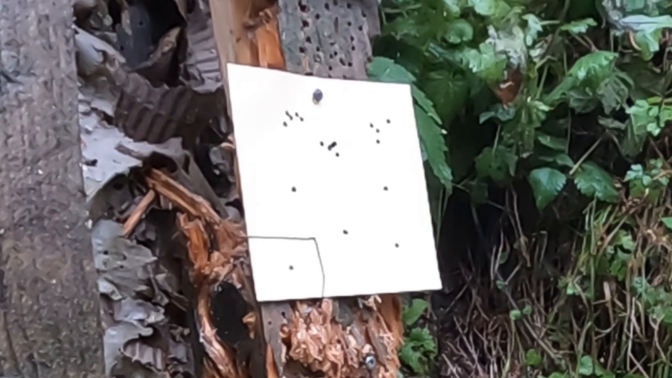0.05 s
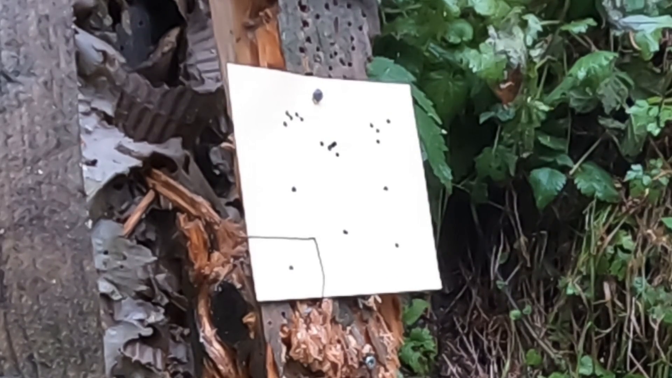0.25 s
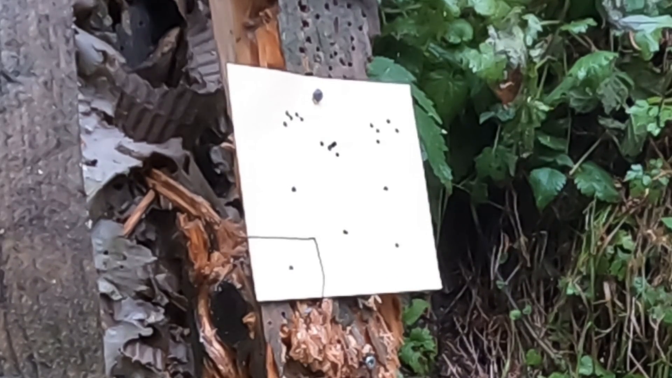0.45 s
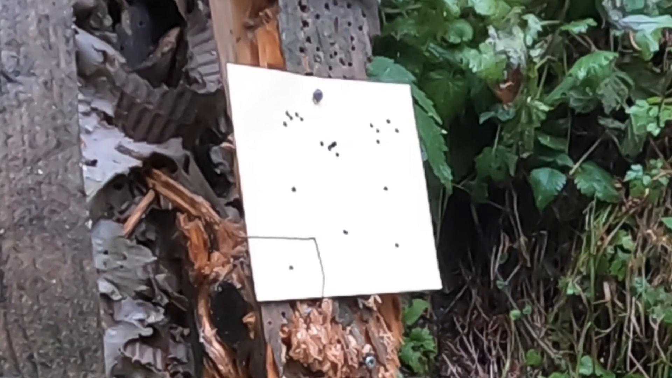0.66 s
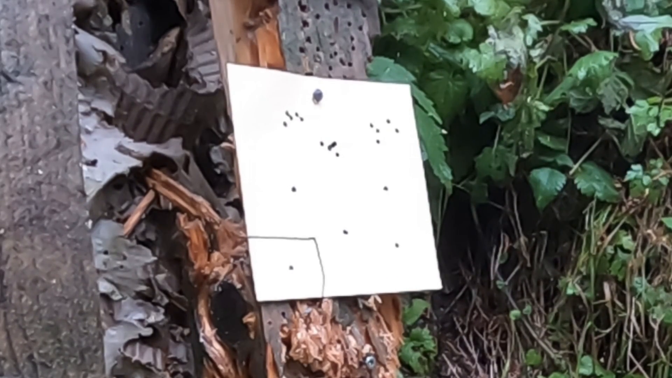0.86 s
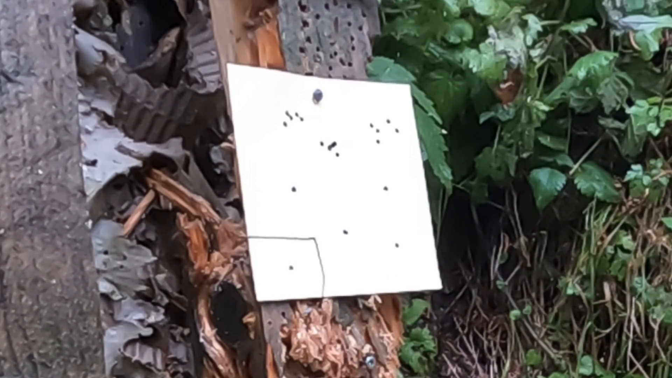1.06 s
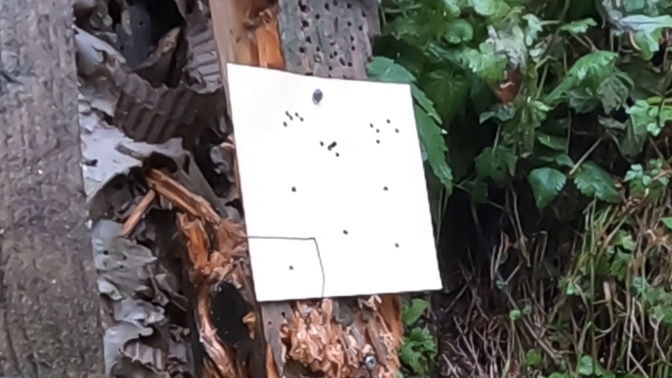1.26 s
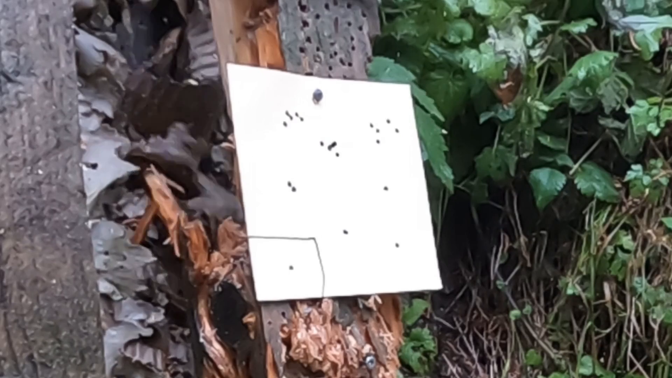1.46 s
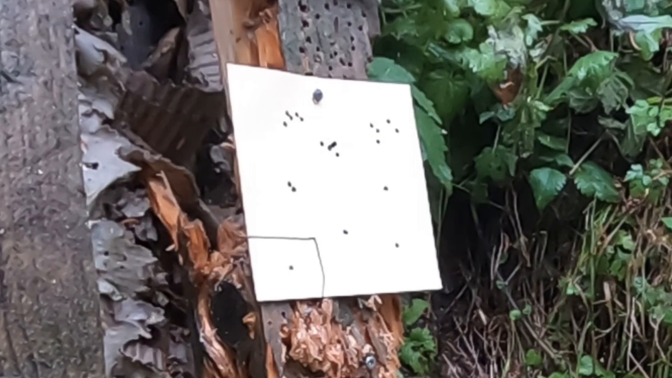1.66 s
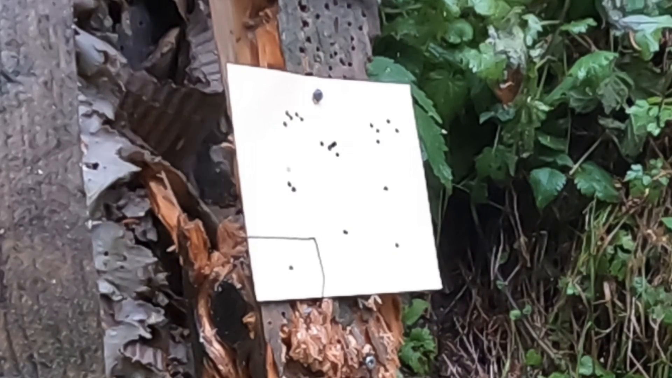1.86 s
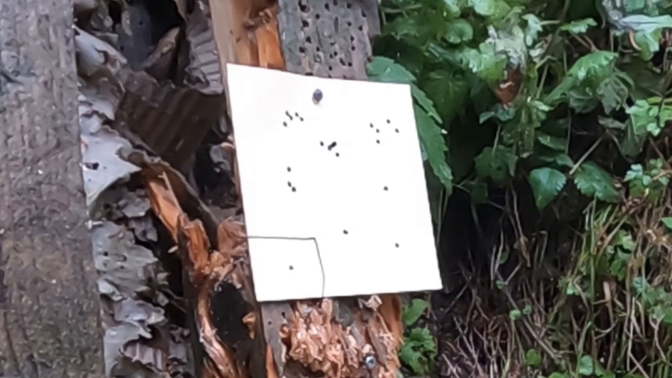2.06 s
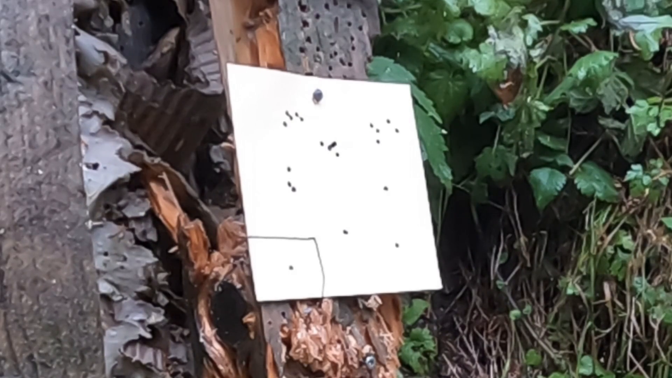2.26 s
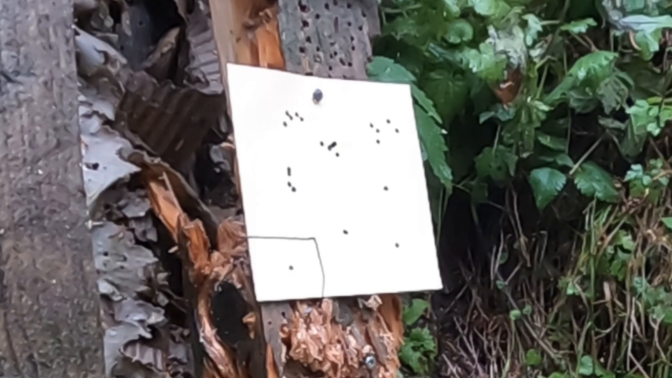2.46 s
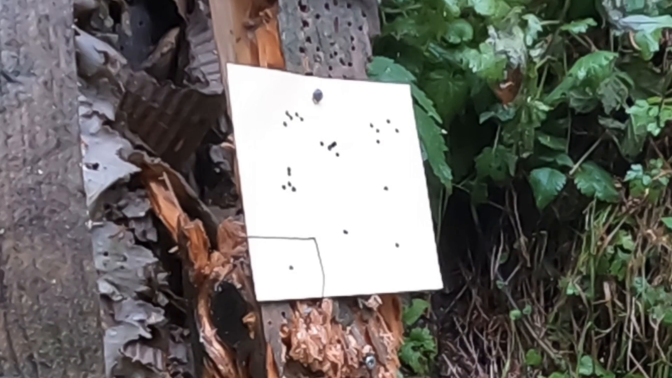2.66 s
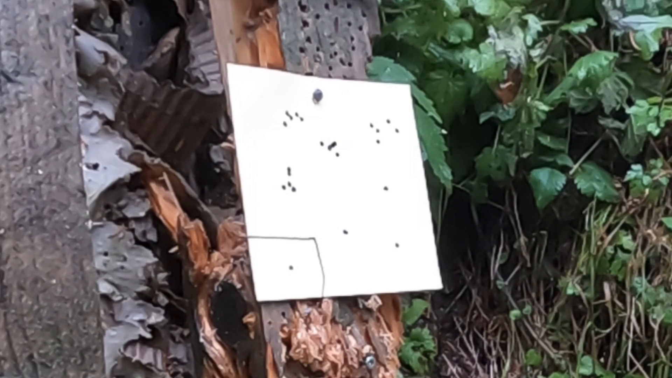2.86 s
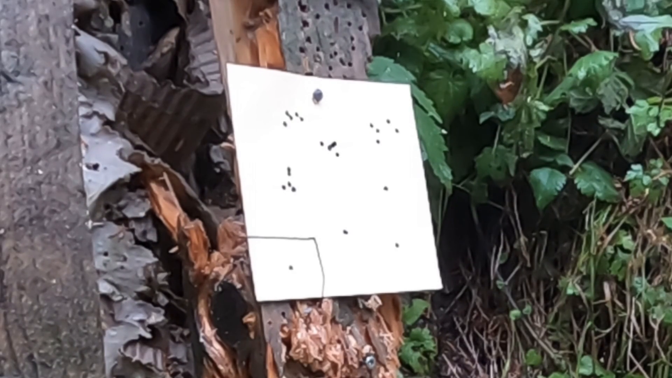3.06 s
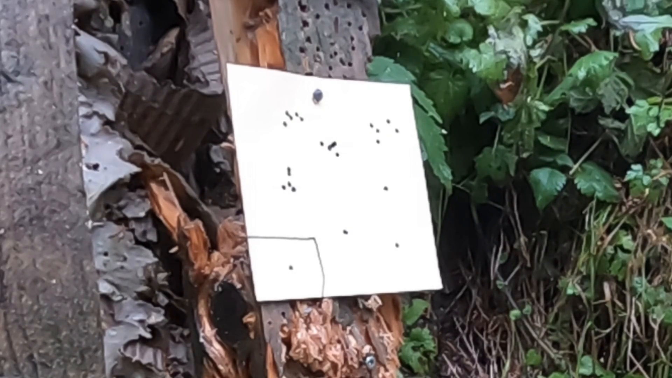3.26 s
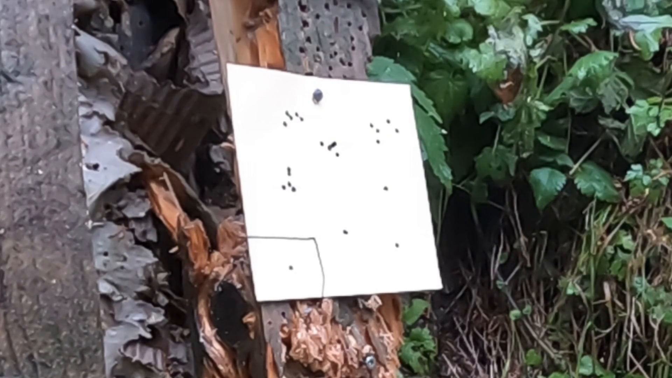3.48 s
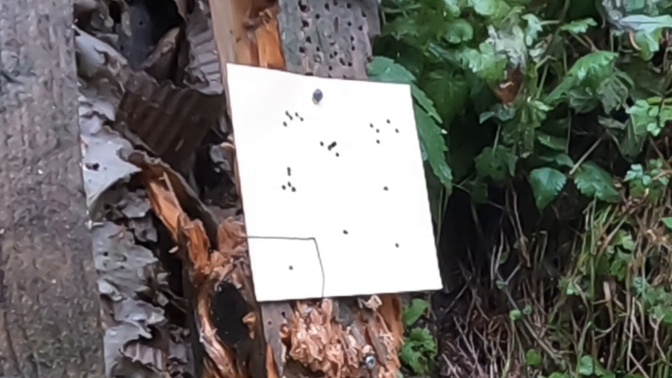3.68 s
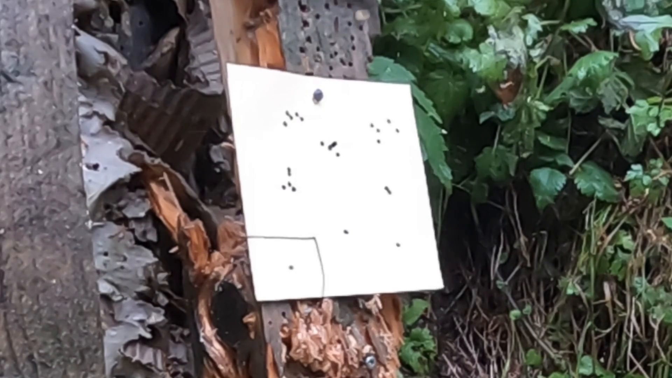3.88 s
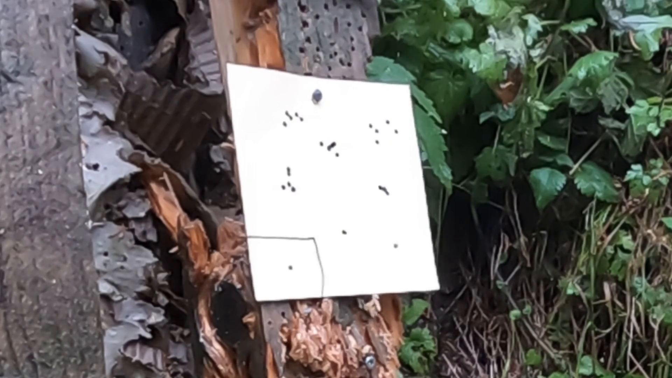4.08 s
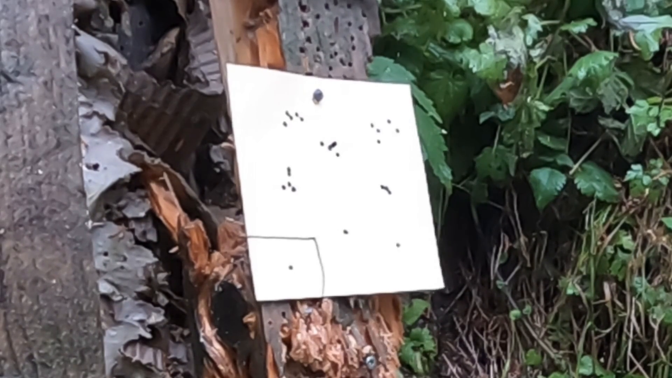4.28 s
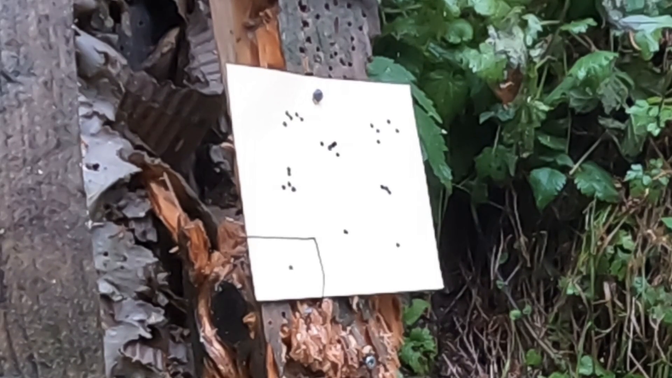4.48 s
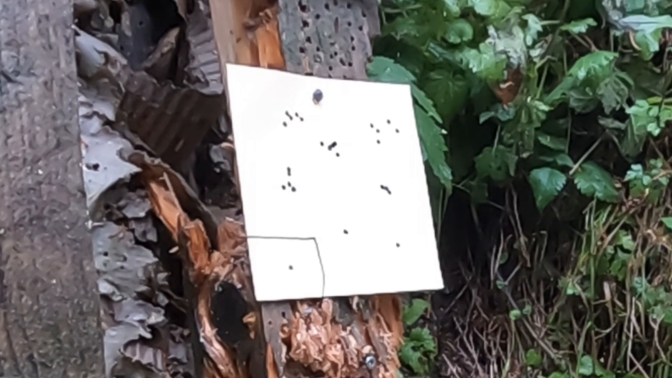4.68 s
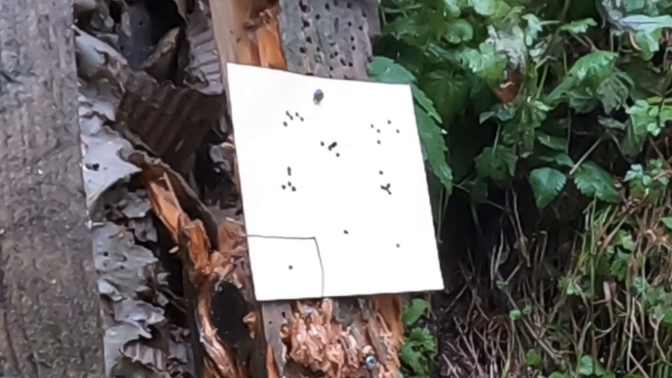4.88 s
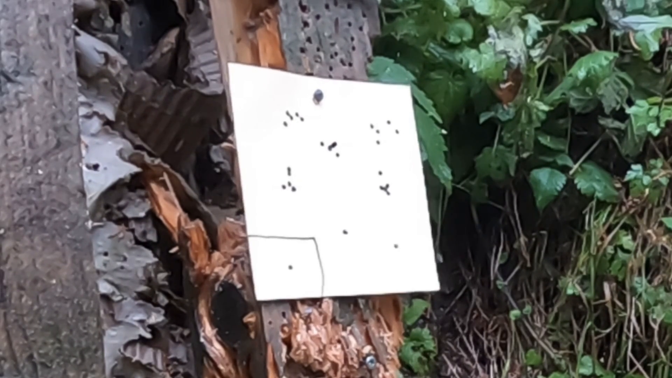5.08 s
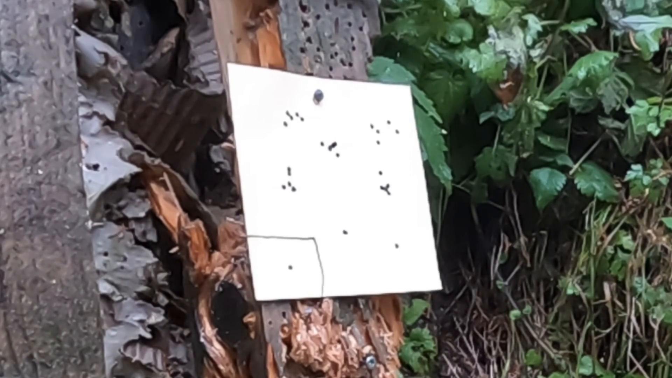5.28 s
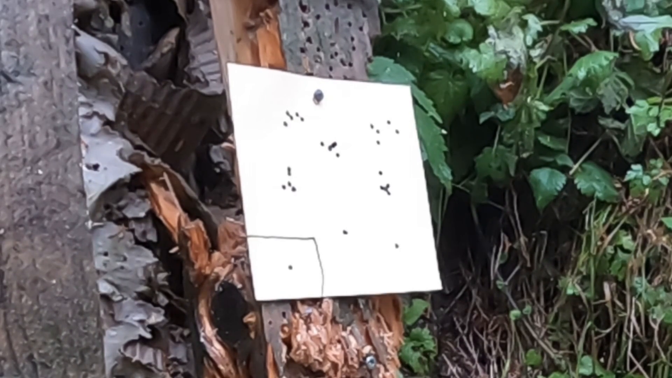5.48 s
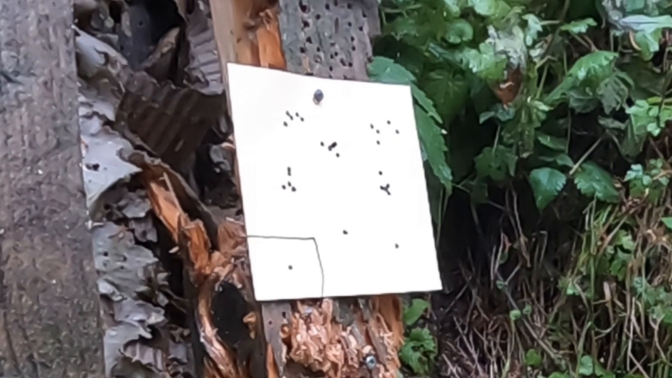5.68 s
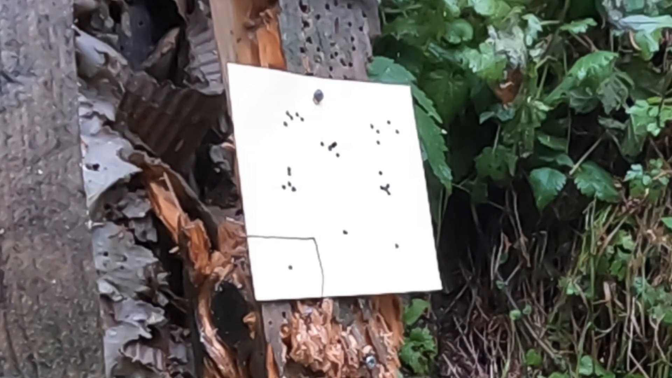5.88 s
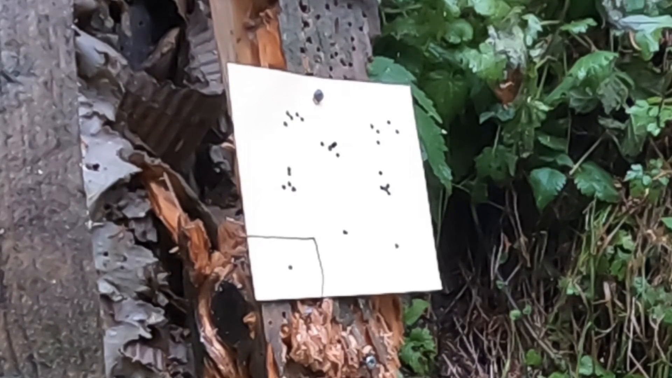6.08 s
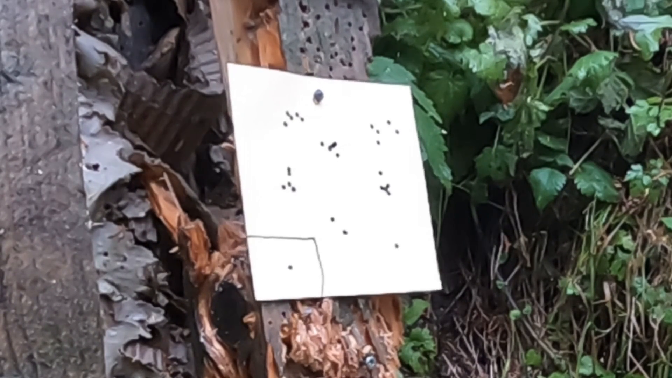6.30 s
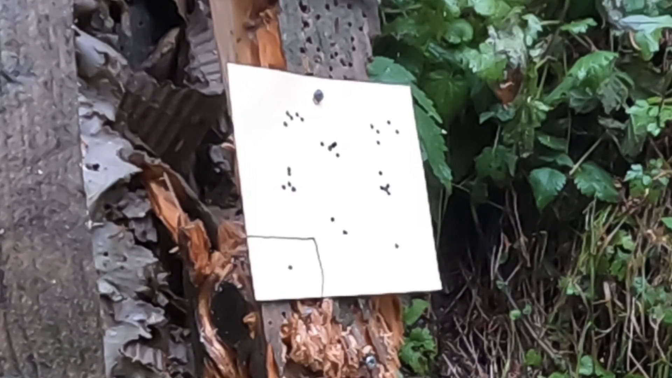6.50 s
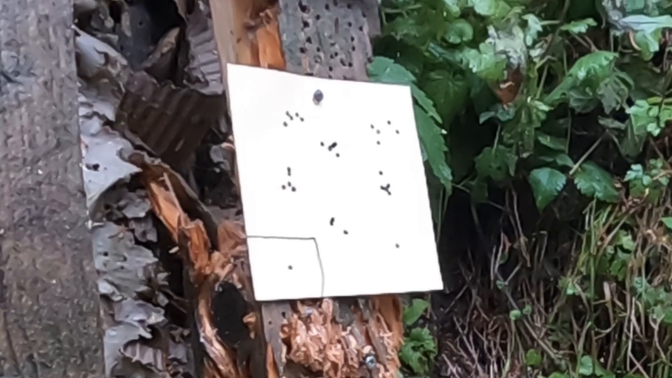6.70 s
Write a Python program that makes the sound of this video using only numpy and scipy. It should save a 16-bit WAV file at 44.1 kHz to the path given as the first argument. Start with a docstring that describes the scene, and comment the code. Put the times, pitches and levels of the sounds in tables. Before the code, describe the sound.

Nine air rifle pellets crack into a card target and the rotten post behind it, right beside the microphone: first a group of four, then three, then two. A distant muzzle pop and a quick hiss run into each hit, and wood splinters briefly after the first. Beneath them lie a low woodland rumble, barely audible birds and, toward the end, a faint far hum.

```python
"""A low rumble in a wood, a far metal click and small birds; then air rifle pellets hit a paper target.
The microphone is close to the target's rotten wooden post. Each of the nine shots is the far pop of the
muzzle, the swelling rush of the pellet, a crack of card and wood that overloads the microphone, and a
faint wash from the trees. A splinter breaks off after the first hit; later a far drone comes up."""
import sys
import numpy as np
from scipy import signal
from scipy.fft import rfft, irfft, next_fast_len
from scipy.io import wavfile
from scipy.ndimage import uniform_filter1d, map_coordinates

SR = 44100
rng = np.random.default_rng(int(sys.argv[2]) if len(sys.argv) > 2 else 0)


def waveform_to_disk(signal):
    """Save audio, clipped to [-1, 1], as 16-bit WAV at the path in sys.argv[1]."""
    frames = np.transpose(np.atleast_2d(signal))
    scaled = np.clip(frames, -1, 1) * 32767
    samples = np.round(scaled).astype(np.int16)
    wavfile.write(sys.argv[1], SR, samples)


N = 297234
SIZE = 16384   # samples in one short sound
TIME, AGE = np.arange(N) / SR, np.arange(SIZE) / SR   # seconds into the scene, into a short sound
POP_LEAD_S = .0448   # range and pellet speed never change, so the pop always leads the hit by this


# Hits on the post: (time [s], hush after it [s], card snap [dB], wood blow [dB], knock pitch [Hz],
# knock [dB], post ring [dB], tick as the background returns [dB])
SHOTS = [(1.5106, 0.21, -0.5, -10.5, 1303, -11.5, 5, -28), (1.9960, 0.15, 1.5, -3, 1052, -3.5, -2, -29),
         (2.5084, .091, -0.5, -6.5, 1037, -12.5, -8, -22.5),
         (2.7852, .180, 3.5, -7.5, 1064, -9.5, -3, -30.5), (3.917, 0.032, -2.5, 3, 2160, -11.5, -5, -13),
         (4.2028, .1453, 1, 1, 596, -18.5, -2, -16), (4.9600, .1877, -4, 1.5, 3180, -7.5, -12, -15),
         (6.2403, 0.092, -1.5, -0.5, 1151, -15.5, -2, -16), (6.7285, .100, -1.5, 1.5, 4950, -15, -1, -20)]
# The dull tick heard as the background returns: (frequency [Hz], level [dB])
TICK_SPECTRUM = [(100, 5), (400, 10.5), (1500, -2.5), (4000, -11), (15000, -24.5)]
def shots(thump_db_per_snap_db=0.65):
    """Each shot: pop, rush, impact and wash; then a dull tick as the hushed background comes back."""
    out = np.zeros((2, N))
    for s, hush_s, snap_db, *wood, tick_db in SHOTS:
        add(out, s - POP_LEAD_S, muzzle() + rush())
        push = from_db(thump_db_per_snap_db * snap_db) * thump()   # a harder snap pushes the card further
        add(out, s, impact(snap_db, *wood) + push + woodland_wash(hush_s))
        add(out, s + hush_s, from_db(tick_db) * pulse(TICK_SPECTRUM))
    return out


# Card snapping and tearing, wood struck and splintering, all close up: (frequency [Hz], level [dB])
SNAP_SPECTRUM = [(200, -9), (800, -5.5), (2000, 3.5), (3300, 15.5), (5000, 14), (7200, 15), (8800, 1.5),
                 (11500, -5.5), (16000, -18)]
TEAR_SPECTRUM = [(1000, -16), (5000, -8), (8500, 3.5), (10000, 10.5), (11400, 8), (12600, -2.5),
                 (16000, -15.5)]
BLOW_SPECTRUM = [(200, -2), (500, 6.5), (780, 1.5), (1080, 21), (1600, 21), (2400, 13.5), (3200, 5.5),
                 (6000, -12), (15000, -24.5)]
FIBRE_SPECTRUM = [(200, -19), (700, -17), (1100, -0.5), (2500, -1), (5000, -5), (7800, -4), (8600, -9.5),
                  (11500, -12.5), (13000, -24.5), (16000, -33)]
# Modes of post and target: (frequency [Hz], level [dB], t60 [s])
POST_MODES = [(220, -21.5, 0.059), (539, -26, 0.027), (1064.2, -24, 0.022), (1460, -20, .016),
              (2385, -18.5, 0.017), (3350, -9.5, 0.012), (3870, -15.5, 0.011), (5035, -15.5, 0.011),
              (5400, -24.5, 0.024), (6100, -26, .015), (7220, -22.5, 0.024), (9070, -28.5, 0.012),
              (10650, -25.5, 0.0061)]
def impact(snap_db, blow_db, knock_hz, knock_db, ring_db, tear_s=.00036, wood_s=.0005, firmness=0.25):
    """The pellet snaps the card, tears through and sinks into the wood, which rings and splinters."""
    card = from_db(snap_db) * (delay(pulse(TEAR_SPECTRUM), tear_s) - pulse(SNAP_SPECTRUM))
    modes = sum(from_db(db + ring_db + rng.standard_normal()) * ring(hz, t60)
                for hz, db, t60 in POST_MODES)
    paper_ring = -from_db(-6) * modes
    knock = from_db(knock_db) * ring(knock_hz, t60=.015)   # each spot has its pitch; rotten wood damps it
    wood = from_db(blow_db) * pulse(BLOW_SPECTRUM) + modes + knock
    crumble_t60 = .0145 * from_db(-firmness * blow_db)   # firm wood: a hard blow, brief splintering
    splinters = from_db(0.05) * noise(FIBRE_SPECTRUM, alike=.88) * fade(crumble_t60)
    return card + paper_ring + delay(wood, wood_s) + splinters


def thump():
    """The card is pushed back and leaves one short trough of pressure."""
    return -from_db(-13.8) * bell(AGE, peak_s=0.0024, width_s=0.0019)


# The pellet's wake and its low buffet, heard at the post: (frequency [Hz], level [dB])
WAKE_SPECTRUM = [(300, -37.5), (1200, -26.5), (1600, -19), (4000, -19.5), (7700, -23.5), (9000, -25),
                 (12000, -28), (13800, -39), (15200, -69.5)]
BUFFET_SPECTRUM = [(40, -14), (150, -6.5), (225, -1), (310, -24.5), (650, -20.5), (870, -15), (1200, -27),
                   (1550, -20.5), (2100, -46.5), (6000, -72)]
def rush(whistle_hz=7905, buffet_steepness=1.4):
    """Turbulent wake, a thin whistle from the pellet's hollow skirt, and a buffet that carries little."""
    level_db = approach_db()
    whistle = from_db(-37) * np.real(waver(width_hz=20, size=SIZE) * np.exp(2j * np.pi * whistle_hz * AGE))
    hiss = (noise(WAKE_SPECTRUM, alike=0.3) + whistle) * from_db(level_db)
    buffet = noise(BUFFET_SPECTRUM, alike=0.51) * from_db(2 + buffet_steepness * level_db)
    return hiss + buffet


def approach_db(far_db=-27, top_db=-2, step_db=10, step_s=.0107, edge_s=.0012, release_t60=0.013):
    """The rush grows in steps as the pellet nears the microphone and dies at once when it lands."""
    to_go_s = POP_LEAD_S - AGE
    steps_away = np.floor(np.maximum(to_go_s, 0) / step_s)
    level_db = np.maximum(top_db - step_db * steps_away, far_db)
    release_db = 60 * np.minimum(to_go_s, 0) / release_t60
    return uniform_filter1d(level_db, size=int(edge_s * SR)) + release_db


# The muzzle from the far end of the range, and its echo: (frequency [Hz], level [dB])
POP_SPECTRUM = [(100, -17.5), (600, -24), (850, -18.5), (1300, -6), (2000, -15.5), (3500, -4), (5500, -5),
                (7200, -12), (9000, -32), (12000, -33.5), (15000, -58)]
TRUNK_SPECTRUM = [(200, -50.5), (700, -49), (1200, -31.5), (1900, -33.5), (3500, -28), (7200, -33),
                  (8800, -44), (12500, -48), (14500, -69)]
def muzzle(ground_s=0.0014, ground_db=-12):
    """The far pop, its bounce off the ground and its scatter among the trunks."""
    pop = -pulse(POP_SPECTRUM)
    bounce = from_db(ground_db) * delay(pop, ground_s)
    onset = np.clip(AGE / ground_s, 0, 1) ** 2
    scatter = noise(TRUNK_SPECTRUM, alike=.8) * fade(t60=.11) * onset
    return pop + bounce + scatter


# The crack coming back from near the post and from deeper in the wood: (frequency [Hz], level [dB])
UNDERGROWTH_SPECTRUM = [(100, -22), (300, -25), (700, -36.5), (1200, -29.5), (1800, -33), (2400, -31.5),
                        (4000, -32.5), (7500, -35.5), (9000, -46), (12000, -44.5), (15000, -69.5)]
TREE_SPECTRUM = [(200, -69.5), (800, -67.5), (1400, -53.5), (3000, -54), (6500, -55.5), (9000, -64),
                 (12000, -69.5), (14500, -90)]
def woodland_wash(hush_s):
    """Quick scatter from the undergrowth and an even wash from the trees, cut short as the hush ends."""
    near = noise(UNDERGROWTH_SPECTRUM, alike=0.72) * fade(t60=0.07)
    far = noise(TREE_SPECTRUM, alike=0.64) * fade(t60=6.3)
    return (near + far) * np.clip((hush_s - AGE) / .002, 0, 1)


# Wood breaking close by: (time [s], level [dB], t60 [s]), and its colour: (frequency [Hz], level [dB])
BREAKS = [(1.6921, -0.5, 0.037)]
BREAK_SPECTRUM = [(200, -29), (600, -29), (1100, -15.5), (1600, -23), (2060, -13), (2900, -26.5),
                  (4130, -20.5), (4700, -24.5), (5500, -15), (7400, -18), (8600, -27), (12000, -40),
                  (15000, -60)]
def splinter():
    """A splinter breaks off the post with a short crunch."""
    out = np.zeros((2, N))
    for s, db, t60 in BREAKS:
        add(out, s, from_db(db) * noise(BREAK_SPECTRUM, alike=0.89) * fade(t60))
    return out


# Far metal clicks: (time [s], level [dB]), and their colour: (frequency [Hz], level [dB])
LATCH_CLICKS = [(0.3642, -54), (4.733, -63.5)]
LATCH_SPECTRUM = [(800, 7), (2500, 4), (4200, 15), (6000, 7.5), (9000, 0), (15000, -11)]
def latch():
    """The rifle is readied: each dry click leaves the spring singing faintly."""
    out = np.zeros((2, N))
    spring = from_db(-29) * ring(hz=4250, t60=0.6)
    for s, db in LATCH_CLICKS:
        click = noise(LATCH_SPECTRUM, alike=.7) * fade(t60=0.0058)
        add(out, s, from_db(db) * (click + spring))
    return out


# The microphone's two ports: (frequency [Hz], left lead [rad]) and (frequency [Hz], left over right [dB])
PORT_LEAD = [(200, 0), (430, -1.2), (800, -1.3), (1500, -.6), (4500, -.62), (6800, -.9), (10000, -.5),
             (15000, -.8)]
PORT_LEVEL = [(150, -1), (500, 2.5), (2500, 1.5), (5200, 3.5), (8500, 1.5), (10500, 1.7), (12000, 8.5)]
def microphone_ports(x):
    """Sound from the range reaches the two ports with a small difference of phase and level."""
    size = next_fast_len(N + SIZE)
    left = from_db(at_hz(PORT_LEVEL, size) / 2) * np.exp(.5j * at_hz(PORT_LEAD, size))
    return irfft(rfft(x, size) * np.array([left, 1 / left]), size)[:, :N]


# Bouts of thin, far twittering: (time [s], length [s], level [dB])
BIRD_TWITTERS = [(.33, 0.25, -79), (0.546, 0.29, -79), (3.3, 0.62, -86), (5.603, 1.25, -85)]
# One bird's short notes: (time [s], starting pitch [Hz], level [dB])
BIRD_NOTES = [(.55, 7300, -74), (2.24, 5600, -83), (4.82, 5500, -71)]
def birds(twitter_hz=6300, flutter_db=3, note_s=0.13, settle_s=0.079):
    """Fluttering twitters and falling notes, blurred by distance and leaves."""
    bouts = sum(from_db(db) * arch(TIME - s, length_s) for s, length_s, db in BIRD_TWITTERS)
    flutter = from_db(flutter_db * np.real(waver(width_hz=12, size=N)))
    out = bouts * flutter * blurred_tone(np.full(N, twitter_hz), blur_hz=850)
    fall_hz = 1300 * (1 - np.exp(-AGE / settle_s))   # steep at first, then levelling off
    for s, start_hz, db in BIRD_NOTES:
        add(out, s, from_db(db) * arch(AGE, note_s) * blurred_tone(start_hz - fall_hz, blur_hz=90))
    return out


# The air of the wood: (frequency [Hz], level [dB]) and (frequency [Hz], left-right likeness [0-1])
AIR_SPECTRUM = [(15, -18), (35, -9.5), (62, -9.5), (90, -23), (130, -30), (190, -40.5), (300, -48),
                (600, -48.5), (1150, -46.5), (1550, -55.5), (2100, -72.5), (3000, -79.5), (7000, -79.5),
                (9000, -95)]
AIR_LIKENESS = [(40, 0.99), (130, .9), (380, 0.71), (950, .52), (2400, 0.74), (8000, 0.23)]
def woodland_air(split_hz=200, swell_db=1.5):
    """A steady low rumble and, above it, a far rustle that swells once, gently."""
    air = noise(AIR_SPECTRUM, alike=at_hz(AIR_LIKENESS, N), size=N)
    low = signal.sosfiltfilt(signal.butter(3, split_hz, fs=SR, output="sos"), air)
    rustle_db = -0.03 + swell_db * bell(TIME, peak_s=4.1, width_s=.8)
    return from_db(-0.96) * low, from_db(rustle_db) * (air - low)


# A drone far off: (time [s], pitch [Hz], level [dB])
DRONE_TRACK = [(4.1, 220.1, -79.5), (4.8, 222.5, -59), (5.15, 273.3, -64.5), (5.48, 265.6, -55.5),
               (5.7, 266, -62.5), (6.74, 269.2, -58.5)]
def drone(surge_db=2):
    """A loose tone with a broad skirt of noise; it comes and goes with the air."""
    s, hz, db = np.transpose(DRONE_TRACK)
    blur = waver(width_hz=24, size=N) + from_db(-2) * waver(width_hz=115, size=N)
    level_db = np.interp(TIME, s, db) + surge_db * np.real(waver(width_hz=4, size=N))
    phase = 2 * np.pi * np.cumsum(np.interp(TIME, s, hz)) / SR
    return from_db(level_db) * np.real(blur * np.exp(1j * phase))


def background(sink_s=0.045, return_s=.005, rumble_dip_db=-6, far_dip_db=-14):
    """Rumble, rustle and drone sink into a brief hush after each crack and come back quickly."""
    hush = sum(np.clip(np.minimum((TIME - s) / sink_s, (s + hush_s - TIME) / return_s), 0, 1)
               for s, hush_s, *_ in SHOTS)
    rumble, rustle = woodland_air()
    return from_db(rumble_dip_db * hush) * rumble + from_db(far_dip_db * hush) * (rustle + drone())


def from_db(db):
    """Decibels to gain."""
    return 10 ** (np.asarray(db) / 20)


def at_hz(points, size):
    """A frequency table read at every bin of a transform."""
    hz, value = np.transpose(points)
    return np.interp(np.log(np.fft.rfftfreq(size, 1 / SR) + 1), np.log(hz), value)


def fade(t60):
    """Exponential decay by 60 dB in t60 seconds."""
    return np.exp(-np.log(1000) * AGE / t60)


def arch(t, length_s):
    """Half a sine from 0 to length_s, silent outside."""
    return np.sin(np.pi * np.clip(t / length_s, 0, 1))


def bell(t, peak_s, width_s):
    """A Gaussian rise and fall."""
    return np.exp(-.5 * ((t - peak_s) / width_s) ** 2)


def noise(spectrum, alike, size=SIZE):
    """Stereo noise of a given colour and left-right likeness."""
    mid, side = rfft(rng.standard_normal((2, size)))
    both = np.sqrt((1 + alike) / 2) * mid + np.sqrt((1 - alike) / 2) * side * [[1], [-1]]
    return irfft(both * from_db(at_hz(spectrum, size)), size)


def pulse(spectrum):
    """The shortest causal click with this spectrum."""
    cepstrum = irfft(np.log(from_db(at_hz(spectrum, SIZE))))
    cepstrum[1:SIZE // 2] *= 2
    cepstrum[SIZE // 2 + 1:] = 0
    return irfft(np.exp(rfft(cepstrum)))


def ring(hz, t60):
    """One struck mode."""
    return np.sin(2 * np.pi * hz * AGE) * fade(t60)


def waver(width_hz, size):
    """Low-passed complex noise of rms 1 that spreads a tone into a band."""
    z = signal.sosfilt(signal.butter(2, width_hz, fs=SR, output="sos"), rng.standard_normal((2, size)))
    return (z[0] + 1j * z[1]) / np.std(z)


def blurred_tone(hz, blur_hz):
    """A tone on the pitch track hz, spread into a band of its own in each channel."""
    blur = np.array([waver(blur_hz, len(hz)), waver(blur_hz, len(hz))])
    return np.real(blur * np.exp(2j * np.pi * np.cumsum(hz) / SR))


def delay(x, s):
    """Delay a short sound by s seconds, to a fraction of a sample."""
    return map_coordinates(x, [(AGE - s) * SR], order=3, mode="grid-constant")


def add(out, s, x):
    """Mix a sound in at time s."""
    at = int(round(s * SR))
    out[:, at:at + x.shape[-1]] += x[..., :max(N - at, 0)]


def scene(lean_db=1.0):
    """The range from beside the post; birds and background lean to the left."""
    shooting = microphone_ports(shots() + splinter() + latch())
    return shooting + (birds() + background()) * from_db([[lean_db], [-lean_db]])


def record(dry, cutoff_hz=16400):
    """The close cracks overload the microphone; the top of the band is cut."""
    clipped = dry / (1 + dry ** 4) ** (1 / 4)
    return signal.sosfilt(signal.ellip(10, .1, 80, cutoff_hz, fs=SR, output="sos"), clipped)


dry = scene()
out = record(dry)
waveform_to_disk(out)
```